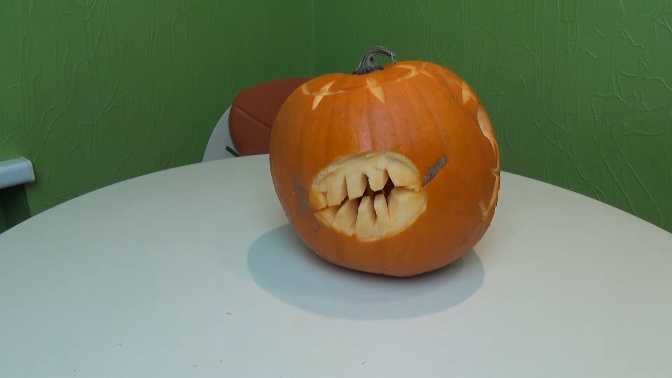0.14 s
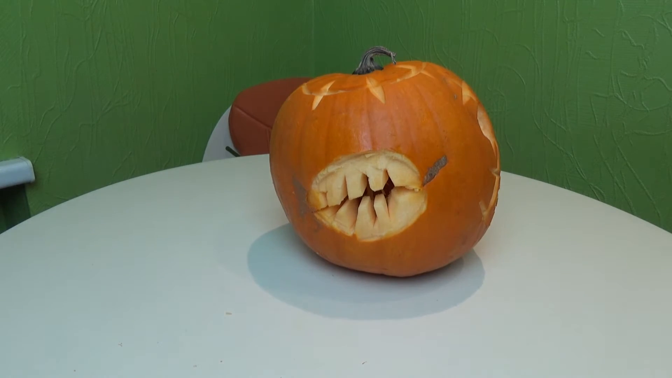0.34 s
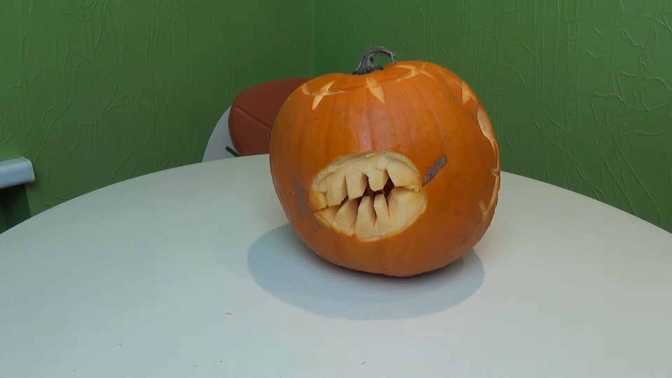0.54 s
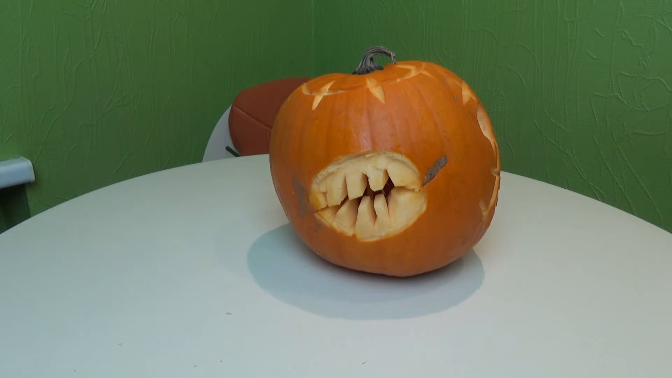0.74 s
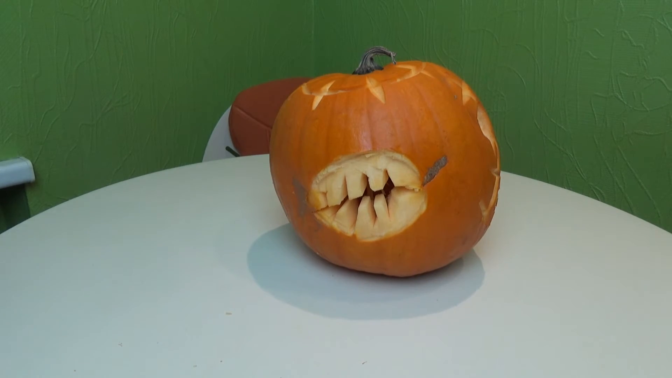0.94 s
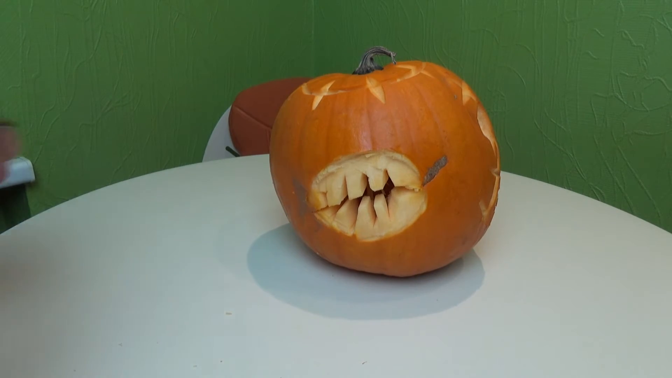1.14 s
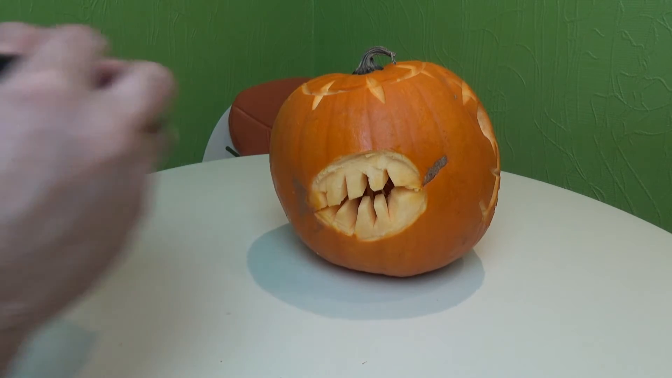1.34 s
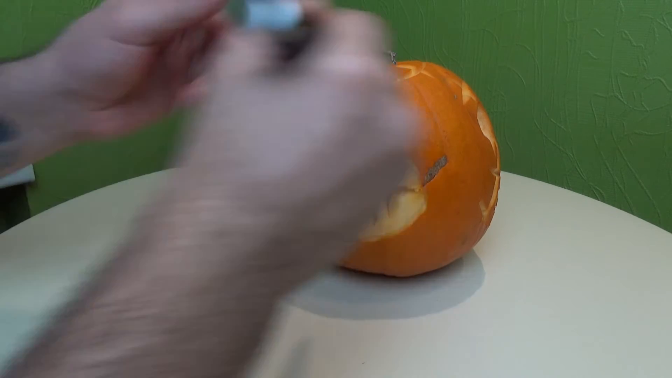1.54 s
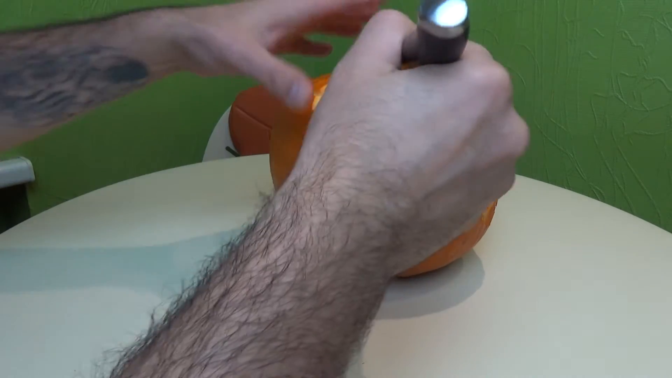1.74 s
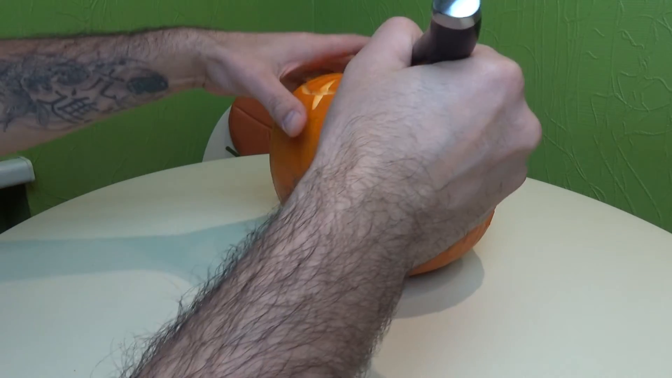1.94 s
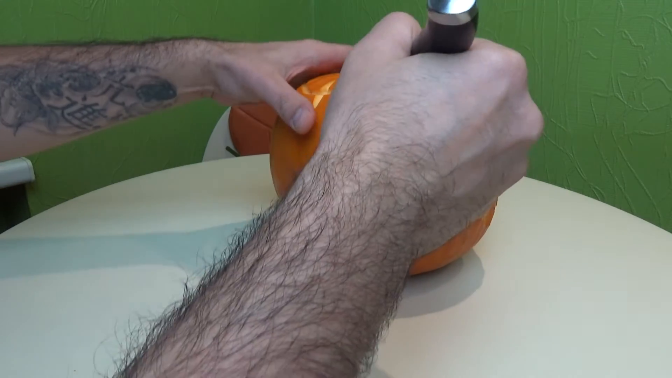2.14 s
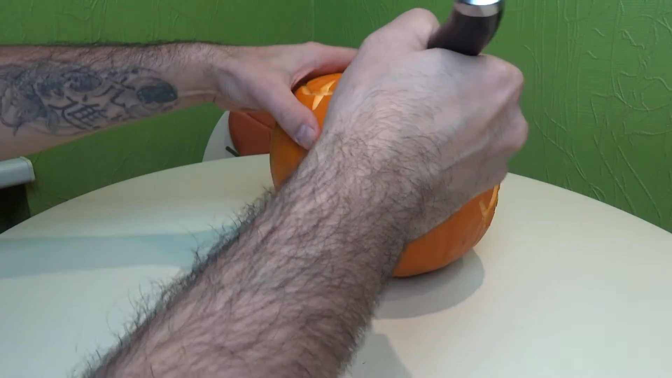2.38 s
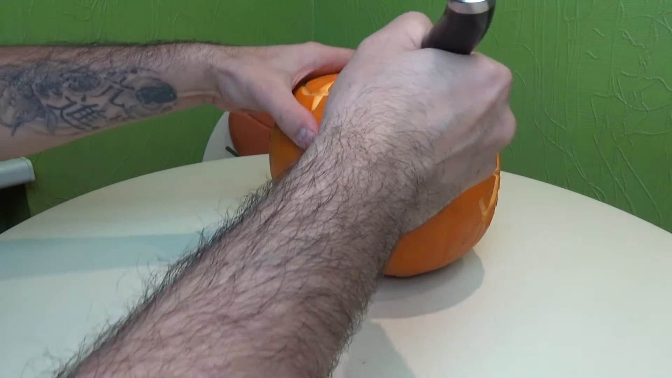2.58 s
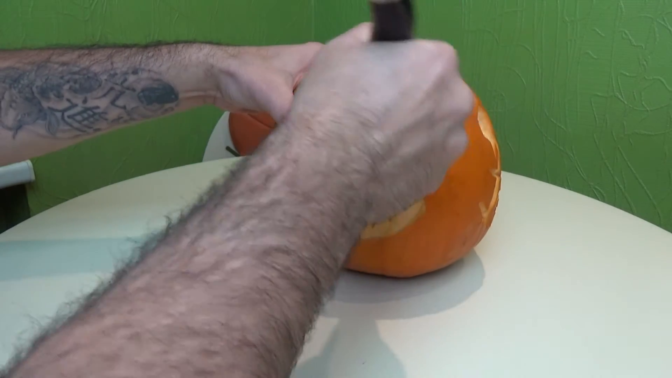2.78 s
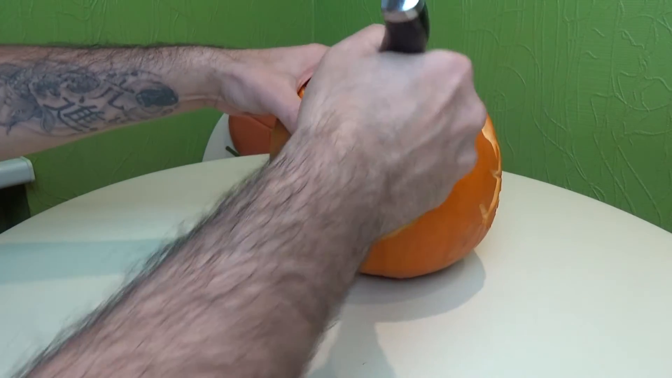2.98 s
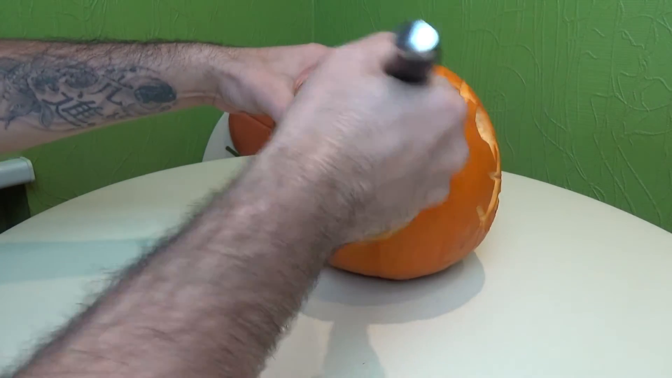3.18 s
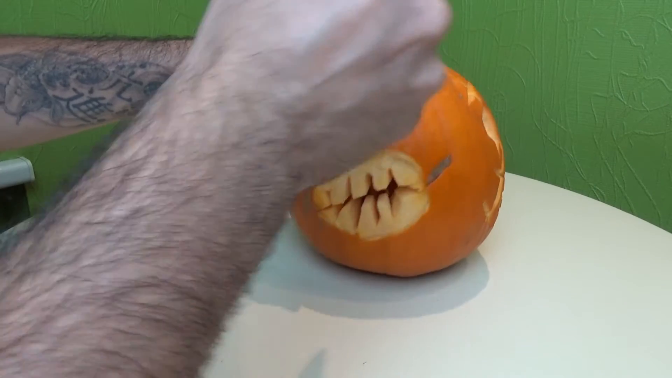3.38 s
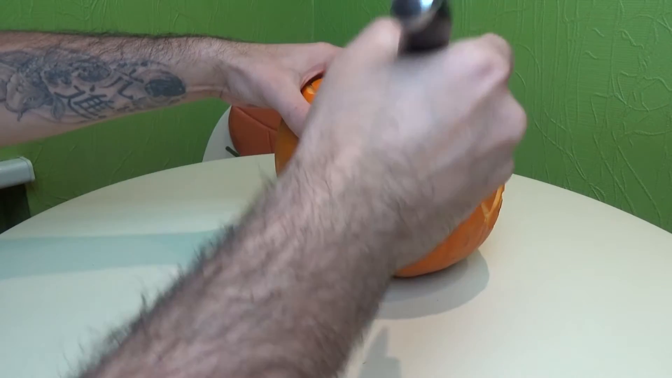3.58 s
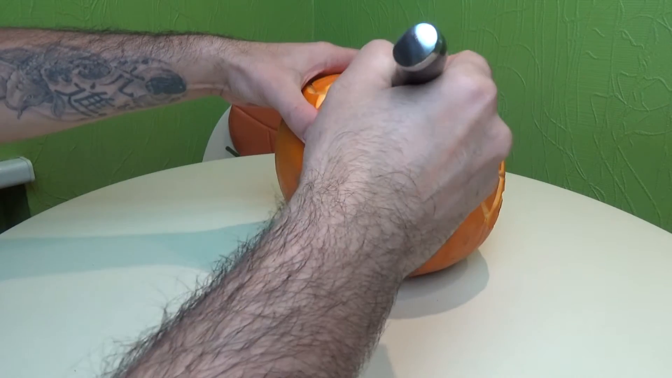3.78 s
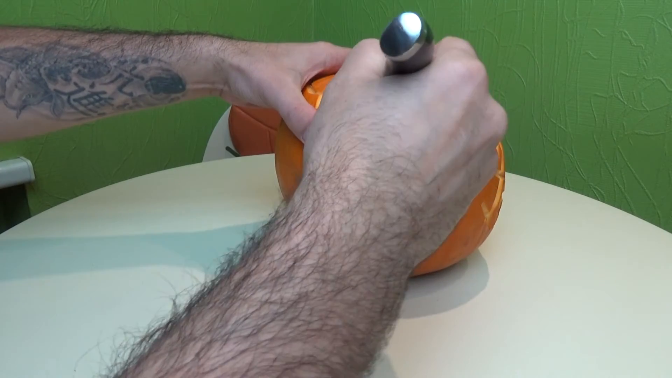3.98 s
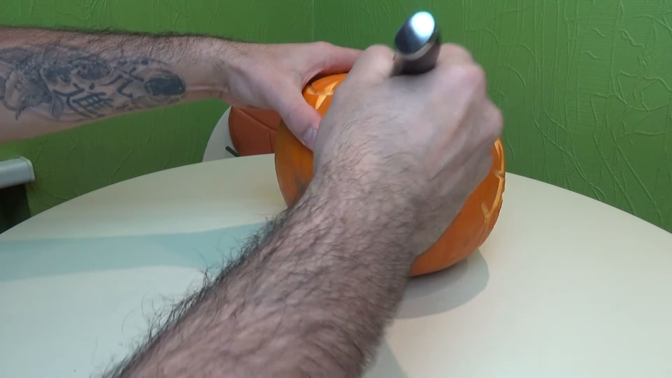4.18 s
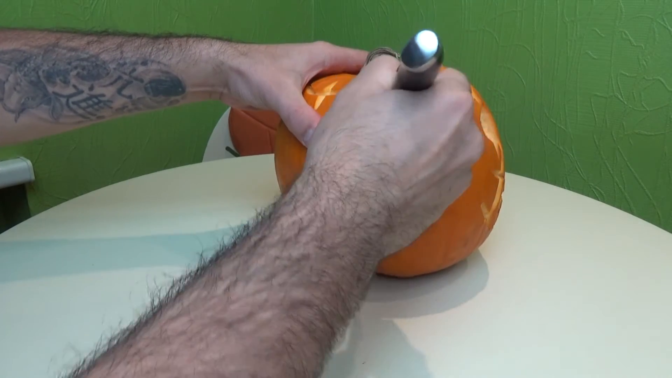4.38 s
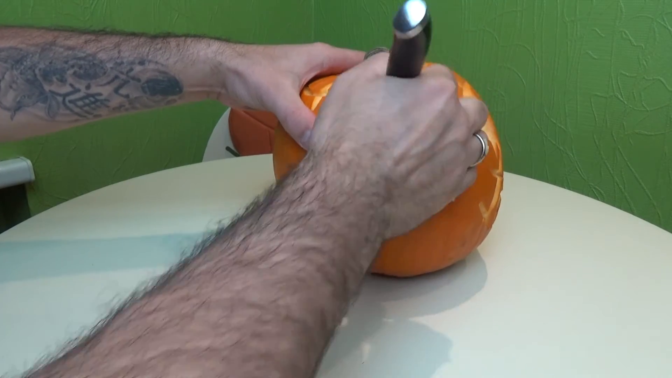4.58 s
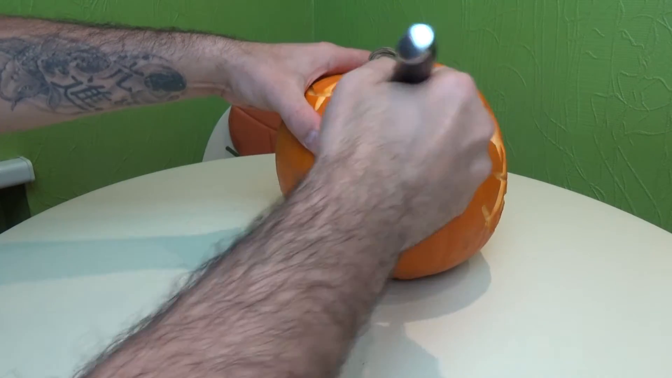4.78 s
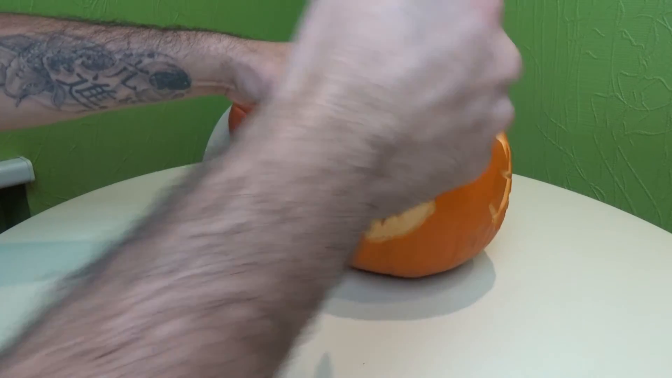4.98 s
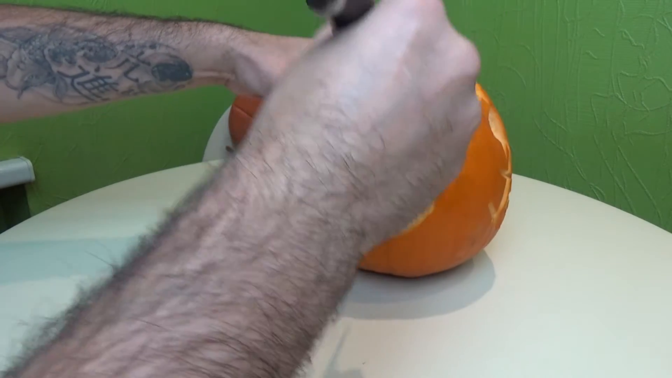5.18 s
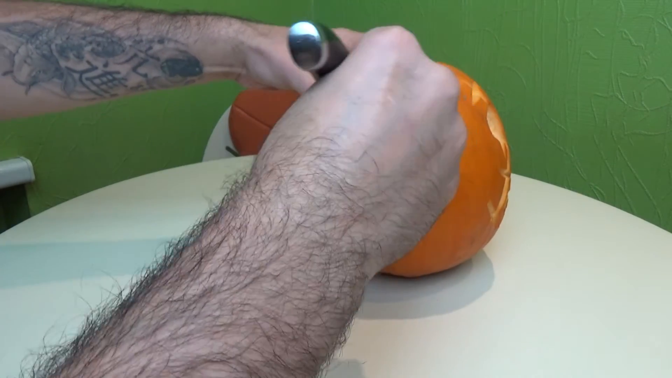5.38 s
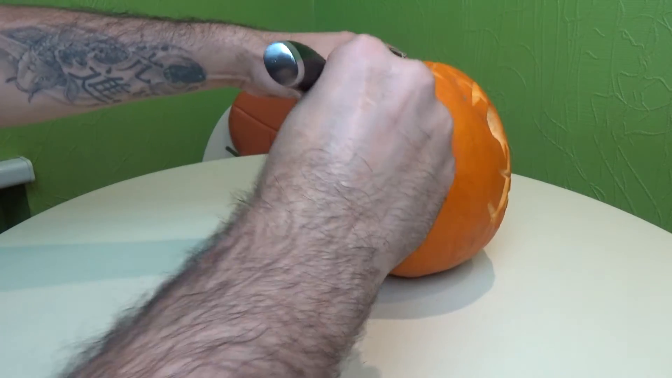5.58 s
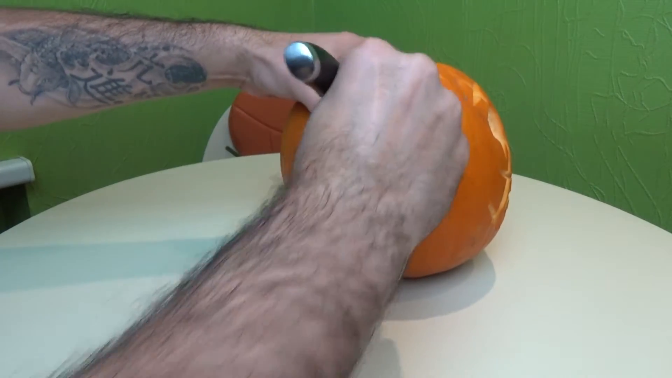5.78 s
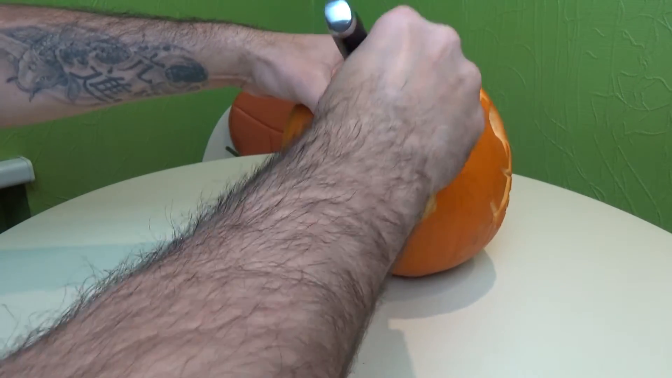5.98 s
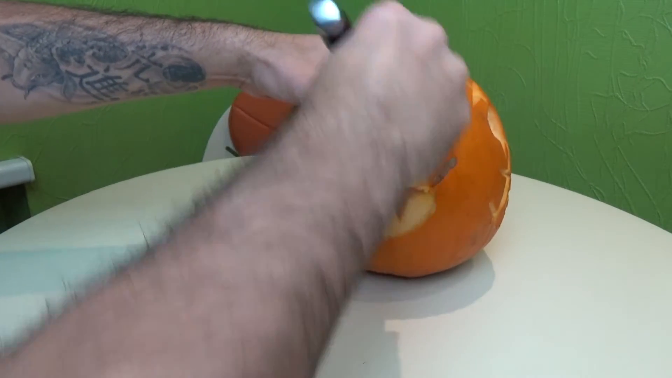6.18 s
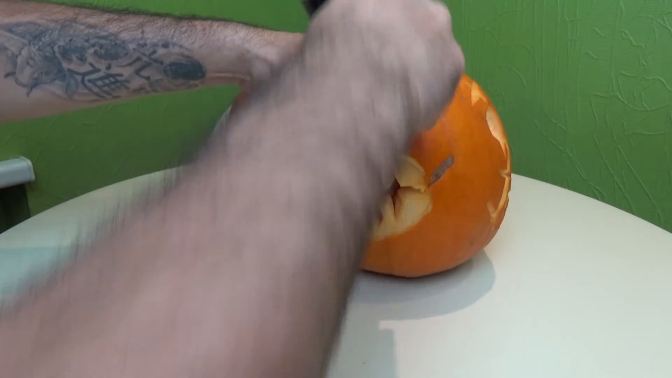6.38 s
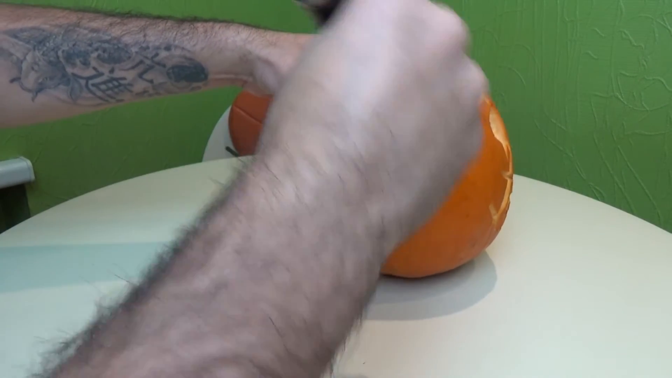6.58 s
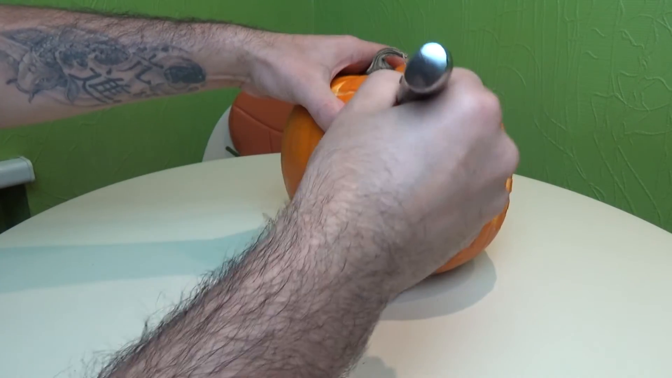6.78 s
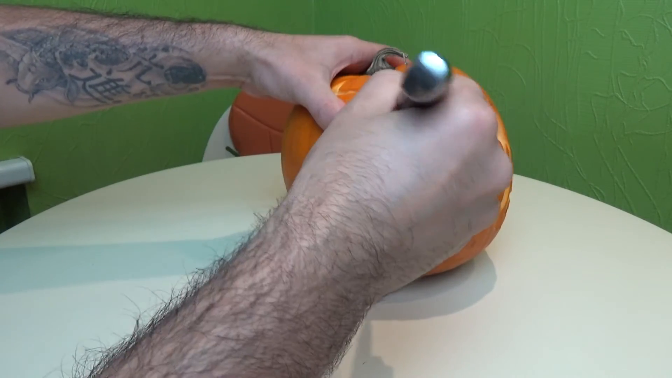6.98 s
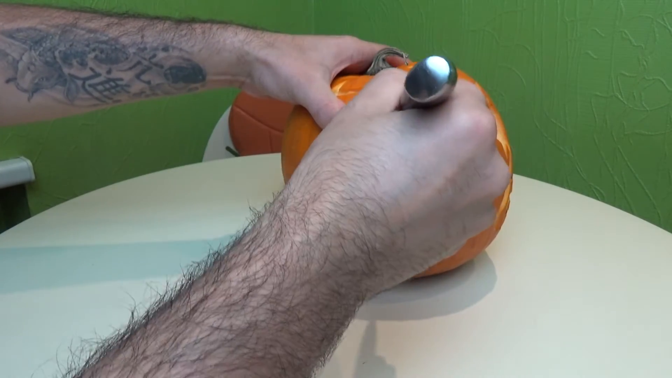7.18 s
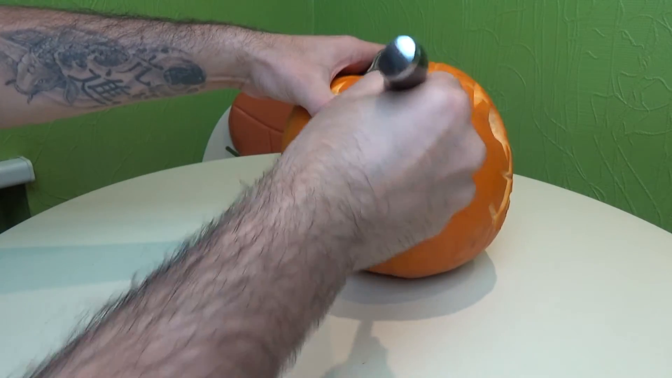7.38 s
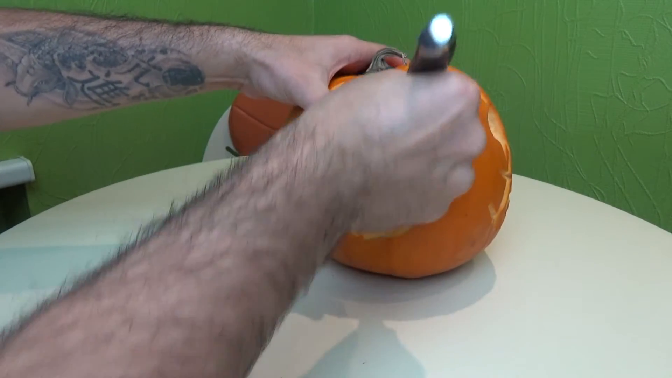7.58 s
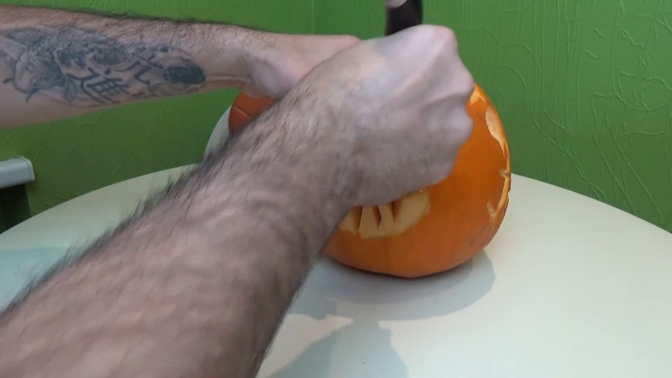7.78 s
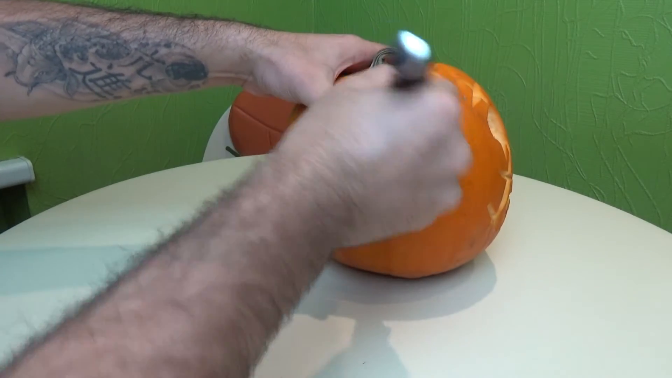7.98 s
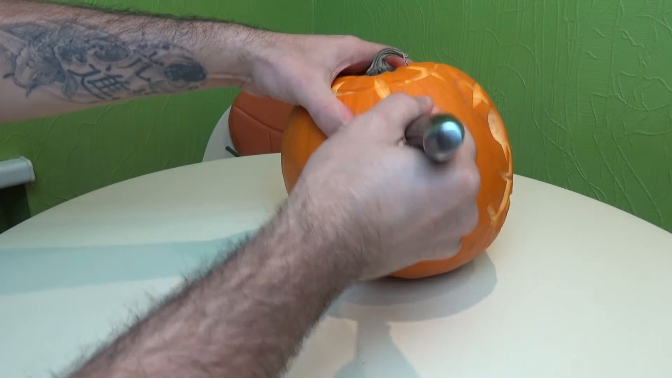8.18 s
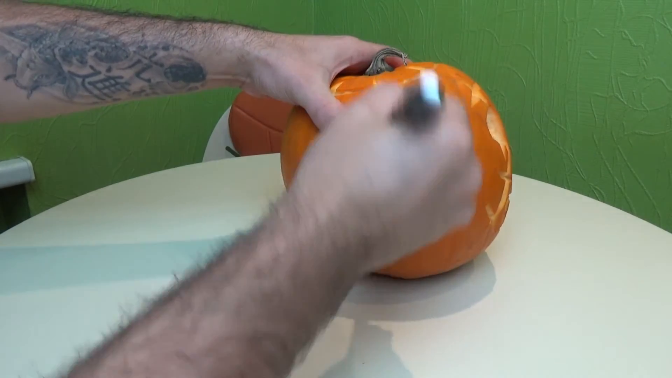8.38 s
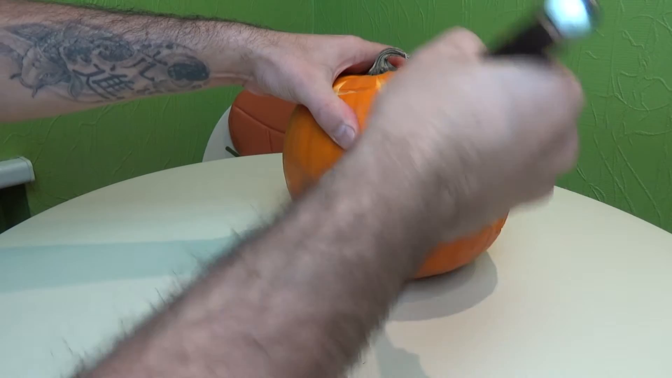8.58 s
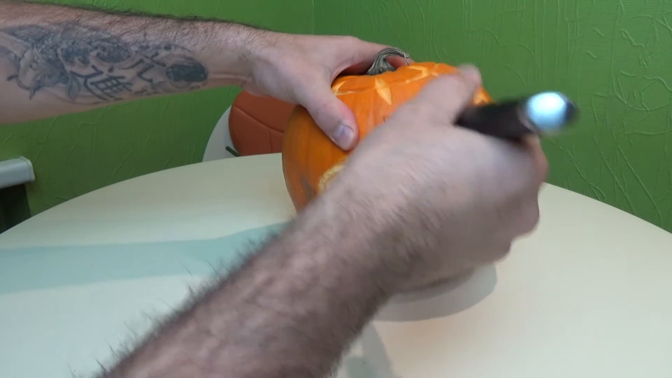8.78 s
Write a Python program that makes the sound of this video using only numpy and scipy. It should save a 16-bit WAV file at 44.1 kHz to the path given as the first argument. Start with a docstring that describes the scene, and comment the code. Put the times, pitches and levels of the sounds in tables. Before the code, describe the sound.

Close stereo sound in a small, briefly echoing room with low hiss, a soft hum and a very faint whine. Around 0.5 s there is a tiny knock, then sleeves rustle, strongest from 1.1 to 2.1 s, with small ticks and a light steel touch at 2.05. At 2.4 s the knife enters the hollow pumpkin with a deep thump and sharp crack, followed by crunchy rasps until 2.8. Knocks and a blade clink come near 3.3 to 3.45. A second group of gritty strokes runs 4.1 to 4.6 with a strong boom at 4.35; the blade rings brightly as it slides out at 4.93. A loud crack and thump at 5.56 start more rasping to 5.9. From 6.2 to 8.3 strokes are lighter, with a clink at 6.9, a thud at 7.54, faint rustling and small snaps. Knocks at 8.4 to 8.55 lead to rapid metallic scraping at 8.7 to 8.85.

```python
"""A hand saws a steel knife through the wall of a hollow pumpkin on a table, close to a camera in a small room.
The edge rasps as uneven coloured noise, the hollow shell booms as resonances driven by pushes and blows,
the rind snaps in short pitched cracks, and the blade rings in its own modes where it slides free.
Clothes rustle as the arms reach in before the first cut, and again more faintly during the sawing;
quiet room tone, a low hum and a faint whine lie underneath, all noise shaped by frequency."""
import sys
import numpy as np
from scipy import signal
from scipy.fft import rfft, irfft, next_fast_len
from scipy.io import wavfile
from scipy.ndimage import uniform_filter1d, map_coordinates

SR = 44100
rng = np.random.default_rng(int(sys.argv[2]) if len(sys.argv) > 2 else 0)


def amplitude_ratio(level_db):
    """Convert a level in decibels to the matching linear amplitude (field) ratio."""
    exponent = np.asarray(level_db, float) / 20
    return 10 ** exponent


def digitize_waveform(pressure):
    """Quantize a signal to 16-bit integers and store it at the path in sys.argv[1].

    Rows of a 2-D input are taken as channels; values are limited to [-1, 1].
    """
    field = np.atleast_2d(pressure).T
    bounded = np.clip(field, -1, 1)
    quanta = np.round(bounded * 32767).astype(np.int16)
    wavfile.write(sys.argv[1], SR, quanta)


N = 389844  # length of the scene in samples

# saw strokes: [start_s, hold_s, level_db]
SAW_STROKES = [(2.39, 0.067, -45), (2.519, 0.035, -35.5), (2.636, 0.054, -31.5), (2.788, 0.023, -37.5),
               (2.963, 0.012, -49.5), (3.181, .029, -49.5), (3.26, 0.063, -49), (4.073, 0.07, -35.5),
               (4.183, 0.076, -33.5), (4.34, 0.025, -30), (4.507, 0.019, -36.5), (4.521, 0.051, -39),
               (4.83, 0.072, -46), (4.923, 0.04, -42), (5.566, 0.077, -40.5), (5.661, 0.064, -31),
               (5.799, 0.063, -34.5), (5.958, 0.095, -51.5), (6.227, 0.085, -39.5), (6.443, 0.095, -52),
               (6.888, 0.015, -37), (7.019, 0.0085, -38.5), (7.186, 0.011, -38), (7.288, 0.12, -47.5),
               (7.447, 0.096, -45.5), (7.616, 0.048, -47), (7.696, 0.073, -54), (7.891, 0.11, -51),
               (8.044, 0.03, -48), (8.122, 0.076, -51), (8.221, 0.069, -51.5), (8.537, 0.018, -38)]
# colour of the rasp: [frequency_hz, relative_level_db]
RASP_COLOUR = [(600, -6.5), (1000, -10.5), (1800, -9.5), (2300, -9), (3200, -6.5), (4900, -12),
               (5700, -2.5), (6500, 0), (8000, -6.5), (9100, -5), (13000, -7), (16000, -13.5)]


def rasp():
    """The edge tears through flesh in an uneven stream; a light touch has less of the low part."""
    force = strokes(SAW_STROKES, rise=0.088, release=1.6) * amplitude_ratio(1.96 * wobble(90))
    # now and then a tough fibre gives, about 350 times a second
    grit = 3.5 * rng.exponential(size=N) * (rng.random(N) < 350 / SR)
    fibres = coloured(tearing(spread_db=2.5) + grit, RASP_COLOUR)
    tear = unit(patchy(fibres, depth_db=4.0))
    deep = filtered(tear, lambda hz: 1 / (1 + 1j * hz / 4500) ** 2)
    treble = tear - deep
    firmness = np.clip(force / amplitude_ratio(-35.5), 0, 1) ** 0.51
    return force * treble + force * firmness * deep


def tearing(spread_db):
    """Fibres parting: one tiny random slip per sample, some larger than the rest."""
    size_db = spread_db * np.minimum(rng.exponential(size=N), 4)
    return rng.standard_normal(N) * amplitude_ratio(size_db)


def strokes(rows, rise, release):
    """Amplitude over time of strokes: bite, hold and release, all slower for a long stroke."""
    power = np.zeros(N + SR)
    t = np.arange(SR // 2) / SR
    for start_s, hold_s, level_db in rows:
        bite = 1 - np.exp(-t / (rise * hold_s))
        let_go = amplitude_ratio(-60 * np.maximum(t - hold_s, 0) / (release * hold_s))
        power[round(start_s * SR):][:len(t)] += (amplitude_ratio(level_db) * bite * let_go) ** 2
    return np.sqrt(power[:N])


# blows into the shell: [start_s, level_db, hardness_db]
BLOWS_ON_SHELL = [(0.54, -39.5, -5.5), (2.395, -13, -21), (2.693, -15.5, -17), (3.02, -33.5, -7),
                  (3.304, -17.5, -7.5), (3.324, -18, -10.5), (3.440, -18, -3.5), (4.342, -12.5, -14),
                  (5.014, -16, -7), (5.343, -26, -10.5), (5.559, -10.5, -15), (5.578, -21.5, -36),
                  (5.803, -19, -14), (5.913, -18.5, -10.5), (6.795, -19, -35), (6.919, -29.5, -13),
                  (7.266, -30, -32), (7.288, -41, -30), (7.542, -15, -19.5), (7.876, -28.5, -4.5),
                  (8.025, -29.5, -29), (8.414, -24.5, -12.5), (8.431, -21.5, -34), (8.555, -21, -7)]
# resonances of the hollow shell: [frequency_hz, width_hz, relative_level_db]
SHELL_MODES = [(173, 49, -16.5), (222, 20.7, -5.5), (269.3, 16.2, 2.5), (324.4, 23, -2.5),
               (356.2, 21.9, 2.5), (364, 90.6, -6)]


def shell():
    """Sticking and slipping of the blade, the steadying hand and each blow ring the hollow shell."""
    push = np.hypot(strokes(pushes(), rise=0.059, release=5.9), hand())
    slip_noise = amplitude_ratio(3.2 * wobble(45)) * rng.standard_normal(N)
    slips = unit(filtered(slip_noise, modes(SHELL_MODES)))
    soft, hard = np.zeros((2, N))
    t = np.arange(SR // 2) / SR
    # a hard contact rattles the stiff rind and the table top under it
    rattle = amplitude_ratio(-60 * t / 0.047) + 0.11 * amplitude_ratio(-60 * t / 1.02)
    for start_s, level_db, hardness_db in BLOWS_ON_SHELL:
        start = round(start_s * SR)
        soft[start] = amplitude_ratio(level_db + 41)
        hard += burst(start_s, amplitude_ratio(level_db + hardness_db + 11.0) * rattle)
        hard[start] += amplitude_ratio(level_db + hardness_db + 20)  # the first contact is one sharp rap
    shell_response = modes(SHELL_MODES)
    boom = filtered(soft, lambda hz: shell_response(hz) / (1 + 1j * hz / 900) ** 2)
    knock = filtered(hard, modes([(177, 52, 5), (460, 343, -0.5), (754, 295, 2), (1520, 550, -15.5)]))
    return push * slips + boom + knock


# how strongly strokes shake the shell, more for a deeper blade: [time_s, boom_over_rasp_db]
BLADE_DEPTH = [(2.4, -0.5), (4.8, 3), (6.0, 1), (6.4, -3.5), (8.3, -6), (8.5, -4)]


def pushes():
    """What shakes the shell: each stroke by the blade's depth, and the blade's judder in its slot."""
    cuts = [(start_s, hold_s, level_db + np.interp(start_s, *np.transpose(BLADE_DEPTH)))
            for start_s, hold_s, level_db in SAW_STROKES]
    judder_s, judder_db = 0.021, -17.5  # hold of the judder, its level relative to the blow's
    judders = [(start_s, judder_s, level_db + judder_db) for start_s, level_db, _ in BLOWS_ON_SHELL]
    return cuts + judders


def hand():
    """Amplitude over time of what the unevenly pressing hand and the sleeves feed into the shell."""
    landing_s, level_db, shifts_db = 2.2, -55.5, 4.5
    landed = np.arange(N) / SR > landing_s
    resting = amplitude_ratio(level_db + shifts_db * wobble(3.395)) * landed
    return np.hypot(resting, amplitude_ratio(-6.5) * rustles())  # the hollow shell answers a rustle near it


# rind snaps and edge ticks: [start_s, level_db, pitch_hz]
RIND_SNAPS = [(0.575, -38.5, 1900), (1.764, -30.5, 1920), (2.053, -29, 6000), (2.395, -17, 6120),
              (2.7929, -33.5, 6660), (3.445, -39, 3060), (4.077, -19.5, 6430), (4.7462, -39.5, 7200),
              (5.5598, -14, 6000), (5.886, -30.5, 8900), (6.274, -31, 5750), (6.3225, -33.5, 5900),
              (6.794, -38, 6940), (7.6545, -35, 6750), (7.75, -35, 7000), (8.06, -38.5, 5400),
              (8.147, -32.5, 6060), (8.2432, -33, 6500)]


def snaps():
    """Each snap is a crack of a few ms with a short ring at its own pitch."""
    out = np.zeros(N + SR)
    t = np.arange(SR // 20) / SR
    fade = amplitude_ratio(-60 * t / 0.011) * np.minimum(t / 0.0004, 1)
    for start_s, level_db, pitch_hz in RIND_SNAPS:
        crack = 0.86 * rng.standard_normal(len(t)) * min(pitch_hz / 5000, 1)
        ring = np.sin(2 * np.pi * pitch_hz * t)
        out[round(start_s * SR):][:len(t)] += amplitude_ratio(level_db + 4.0) * (ring + crack) * fade
    return filtered(out[:N], lambda hz: 1j * hz / (1j * hz + 1500))  # weaker below 1500 Hz


# the blade is struck and slides, grip being that of the flesh:
# [start_s, level_db, slide_s, grip_0_to_1, brightness_db_per_octave]
BLADE_SLIDES = [(2.0573, -25.5, 0.0052, 0.1, 6), (3.3211, -17, 0.0018, 0.34, 0),
                (4.9329, -11, 0.051, 0.01, 3), (6.917, -14, 0.0015, 0.57, 1.5), (8.708, -21, 0.015, 1, 0),
                (8.731, -22, 0.0099, 0.88, -4), (8.759, -32.5, .006, 0.95, 0), (8.777, -15, 0.012, 0.88, 4),
                (8.83, -26, 0.013, 0.8, 8)]
# resonances of the free blade, widths before sliding broadens them: [frequency_hz, width_hz, relative_level_db]
FREE_BLADE_MODES = [(1780, 55, -7.5), (2960, 220, -8), (3820, 370, -11.5), (5540, 110, 1), (6530, 340, -6),
                    (8470, 90, 2), (9750, 250, -14.5), (10700, 110, -8), (11700, 90, 1), (14500, 350, -15),
                    (15200, 180, -13)]
# resonances of the blade with its tip in the flesh: [frequency_hz, width_hz, relative_level_db]
HELD_BLADE_MODES = [(3180, 85, -7.5), (6500, 99, 3), (8660, 430, -13), (13600, 1800, -15)]


def blade():
    """A rap rings the steel and chatter along the edge keeps it ringing; flesh shifts and damps the modes."""
    t = np.arange(SR // 2) / SR
    tick = amplitude_ratio(-60 * t / 0.014)
    chatter = amplitude_ratio(2.8 * wobble(120))
    ring, scrape, held = np.zeros((3, N))
    for start_s, level_db, slide_s, grip, bright_db in BLADE_SLIDES:
        smear = 1 + slide_s / 0.15  # a slide of 0.15 s doubles the width of the modes
        fall_db = 60 * np.maximum(t - slide_s, 0) / (0.006 + 4.6 * slide_s)
        drag = chatter * burst(start_s, amplitude_ratio(level_db - 14.5 - fall_db))
        push = burst(start_s, amplitude_ratio(level_db - 5.0 * grip) * tick) + drag
        drag[round(start_s * SR)] += amplitude_ratio(level_db + 13)  # the rap at contact
        steel = modes([(hz, width_hz * smear, db) for hz, width_hz, db in FREE_BLADE_MODES])
        bright_ring = filtered(drag, lambda hz: steel(hz) * amplitude_ratio(bright_db * np.log2(hz / 8000 + 0.01)))
        ring += (1 - grip) / smear * bright_ring
        scrape += push
        held += grip * push
    free_ring = amplitude_ratio(17.5) * ring
    held_ring = amplitude_ratio(8.5) * filtered(held, modes(HELD_BLADE_MODES))
    return free_ring + held_ring + amplitude_ratio(-5.0) * coloured(scrape, RASP_COLOUR)


def table():
    """The table top sways under each stroke and shakes the camera: a slow swell of low noise."""
    sway = uniform_filter1d(strokes(pushes(), rise=0.42, release=27), size=2000)
    rumble = wide([(15, 2.0), (35, -4), (90, -3), (160, -5), (400, -83)], side_db=-14)
    return amplitude_ratio(-21.5) * sway * rumble


def near_walls(x, side_db, t60):
    """First echoes off table and corner reach the two ports in opposite sense."""
    t = np.arange(SR // 20) / SR
    echo = rng.standard_normal(len(t)) * amplitude_ratio(-60 * t / t60)
    side = amplitude_ratio(side_db) * signal.fftconvolve(x, echo / np.linalg.norm(echo))[:N]
    return np.array([side, -side])


# decay of the room, time to fall by 60 dB: [frequency_hz, t60_s]
ROOM_DECAY = [(200, 0.28), (6000, 0.63), (9000, 0.41), (15000, 0.37)]


def room(x, side_db):
    """Each frequency of the room's answer dies at its own speed; the close ports share most of it."""
    hz, t, z = signal.stft(rng.standard_normal((2, SR * 3 // 4)), SR, nperseg=256)
    decay = amplitude_ratio(-60 * t / along(ROOM_DECAY, hz)[:, None])
    mid, side = signal.istft(z * decay, SR, nperseg=256)[1]
    tail = np.array([mid + amplitude_ratio(side_db) * side, mid - amplitude_ratio(side_db) * side])
    delayed = np.pad(x, (250, 0))  # 250 samples before the answer begins
    return signal.fftconvolve(delayed[None], tail / np.linalg.norm(tail[0]), axes=1)[:, :N]


# sleeves and arms brushing, start and hold before the fades: [start_s, hold_s, level_db, extra_treble_db]
CLOTH_RUSTLES = [(0.518, 0.4, -58, 1), (0.884, 0.52, -55.5, 10), (1.088, 0.17, -45.5, -16),
                 (1.447, 0.68, -46, -1.5), (4.616, 0.47, -59.5, -12), (5.382, 0.44, -62, -29),
                 (7.194, 0.66, -53, 0)]


def rustles(bright=0):
    """Amplitude over time of the brushing cloth, or (bright=1) of its treble."""
    t = np.arange(N) / SR
    out = np.zeros(N)
    for start_s, hold_s, level_db, treble_db in CLOTH_RUSTLES:
        brushing = (t > start_s) & (t < start_s + hold_s)
        out += amplitude_ratio(level_db + bright * treble_db) * brushing
    fade = round(0.087 * SR)  # two averages over 0.087 s make each rustle swell and die
    return uniform_filter1d(uniform_filter1d(out, size=fade), size=fade)


# colour of the cloth: [frequency_hz, relative_level_db]
CLOTH_COLOUR = [(300, -10.5), (560, 5), (1100, -3.5), (1950, -0.5), (2350, -3), (2840, 1.5), (3400, -6.5),
                (6100, -4), (8000, -13), (12000, -9), (15500, -17)]


def clothes():
    """Cloth rubs as coloured noise, its treble rising and falling by its own amounts."""
    cloth = wide(CLOTH_COLOUR, side_db=-13.5) * amplitude_ratio([[0.8], [-0.8]])  # the arms come from the left
    dull = filtered(cloth, lambda hz: 1 / (1 + (hz / 5250) ** 4))
    return rustles() * dull + rustles(bright=1) * (cloth - dull)


# colour of the room tone: [frequency_hz, relative_level_db]
ROOM_TONE_COLOUR = [(20, -29), (60, -15), (150, -8), (480, -13), (2000, -26), (2600, -26.5), (6300, -27.5),
                    (15500, -29.5)]


def background():
    """Steady coloured room noise, with narrow noise bands as a wavering low hum and a faint whine."""
    hum = unit(filtered(rng.standard_normal(N), modes([(203.6, 6.6, 0)])))
    whine = unit(filtered(rng.standard_normal(N), modes([(9260, 72, 0)])))
    tone = wide(ROOM_TONE_COLOUR, side_db=-11)
    return amplitude_ratio(-52.5) * tone + amplitude_ratio(-57.5) * hum + amplitude_ratio(-74) * whine


def unit(x):
    """Scaled to rms 1."""
    return x / np.sqrt(np.mean(x ** 2) + 1e-20)


def along(points, hz):
    """(frequency_hz, value) points read on a log frequency axis."""
    f, v = np.transpose(points)
    return np.interp(np.log(hz + 1), np.log(f + 1), v)


def wobble(rate):
    """A smooth random curve, rate knots a second."""
    knots = rng.standard_normal(int(N * rate / SR) + 4)
    return map_coordinates(knots, [np.arange(N) * rate / SR])


def burst(start_s, envelope):
    """A noise burst under the envelope, beginning at start_s."""
    out = np.zeros(N + SR)
    out[round(start_s * SR):][:len(envelope)] = envelope * rng.standard_normal(len(envelope))
    return out[:N]


def filtered(x, response):
    """x shaped by a complex response of frequency."""
    m = next_fast_len(N + SR // 2)
    return irfft(rfft(x, m) * response(np.fft.rfftfreq(m, 1 / SR)), m)[..., :N]


def modes(rows):
    """Causal response of a set of resonances, alternating in sign."""
    def response(f):
        """Sum of the resonances at frequencies f."""
        total = 0
        for k, (centre, width, db) in enumerate(rows):
            damping = 1j * f * width
            total = total + (-1) ** k * amplitude_ratio(db) * damping / (centre * centre - f * f + damping)
        return total
    return response


def coloured(x, spectrum):
    """x with a given spectrum, nothing ahead of its cause (minimum phase)."""
    def response(hz):
        """Folded cepstrum of the log gain."""
        c = irfft(np.log(amplitude_ratio(along(spectrum, hz))))
        c[1:len(c) // 2] *= 2
        c[len(c) // 2 + 1:] = 0
        return np.interp(hz, np.fft.rfftfreq(len(c), 1 / SR), np.exp(rfft(c)))
    return filtered(x, response)


def patchy(x, depth_db):
    """Random patches of gain, several hundred Hz by some fifteen ms."""
    z = signal.stft(x, nperseg=256)[2]
    field = uniform_filter1d(uniform_filter1d(rng.standard_normal(z.shape), 5, 0), 5, 1)
    return signal.istft(z * amplitude_ratio(depth_db * unit(field)), nperseg=256)[1][:N]


def wide(spectrum, side_db):
    """Uneven stereo noise, mostly shared by both ports."""
    mid, side = coloured(rng.standard_normal((2, N)), spectrum)
    mid = patchy(mid, depth_db=1.3)
    return unit(np.array([mid + amplitude_ratio(side_db) * side, mid - amplitude_ratio(side_db) * side]))


def scene():
    """The shell booms a little to the right; the knife is in the middle."""
    knife = rasp() + snaps() + blade()
    boom = shell()
    direct = knife + boom * amplitude_ratio([[-0.7], [0.7]]) + near_walls(knife, side_db=-17.0, t60=0.016)
    reverb = amplitude_ratio(-7.5) * room(knife, side_db=-13.5) + amplitude_ratio(-1) * room(boom, side_db=-15)
    return direct + reverb + table() + clothes() + background()


def low_pass(x):
    """Removes everything above the highest recorded frequency."""
    return signal.sosfilt(signal.butter(12, 16820, fs=SR, output="sos"), x)


def record(dry):
    """The stereo scene is the finished mix, with no further layer or level change here."""
    return low_pass(dry)


dry = scene()
out = record(dry)
digitize_waveform(out)
```